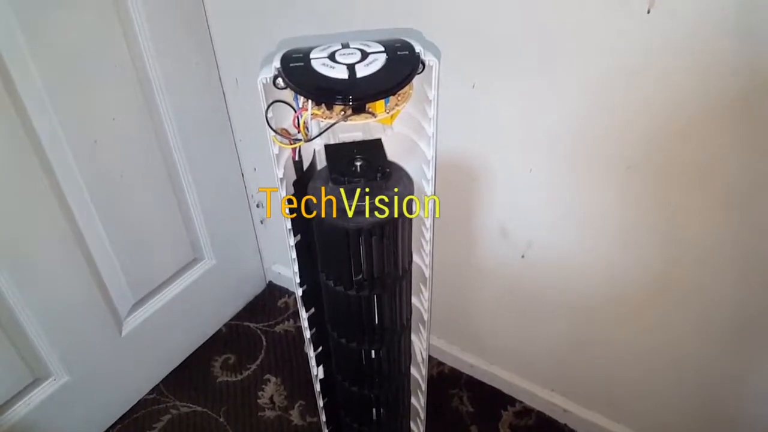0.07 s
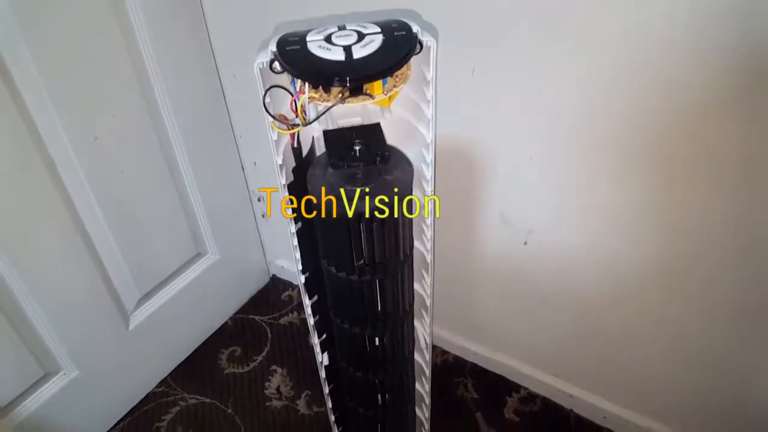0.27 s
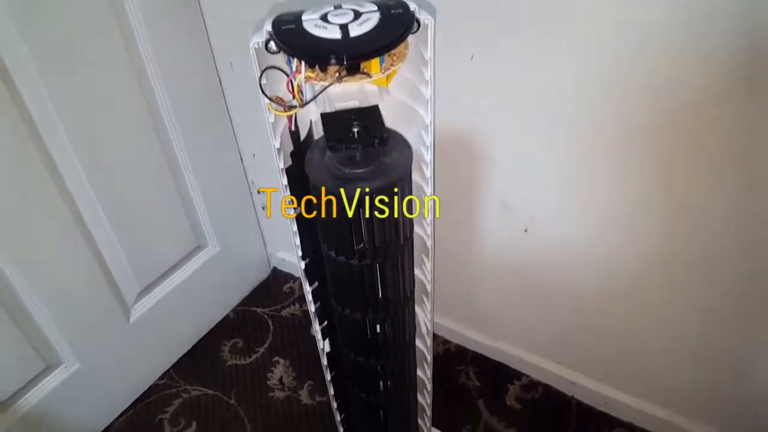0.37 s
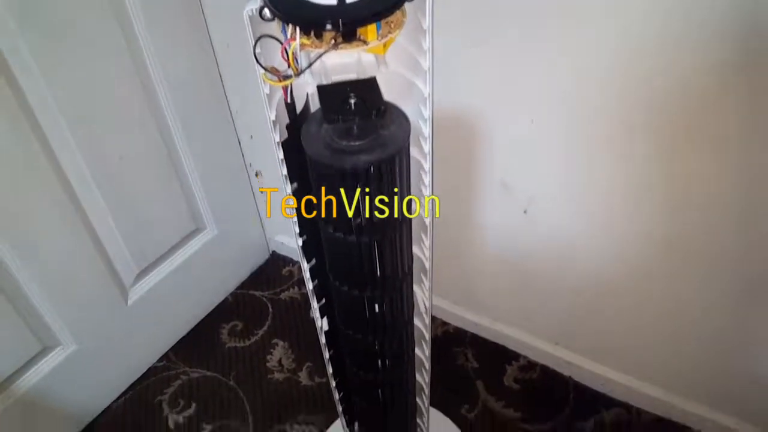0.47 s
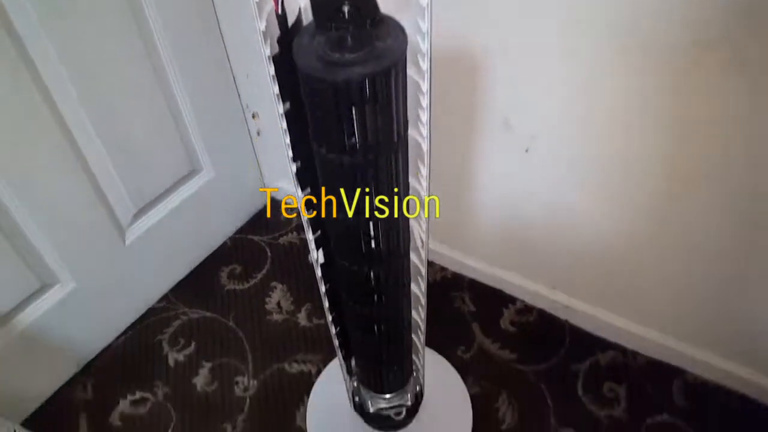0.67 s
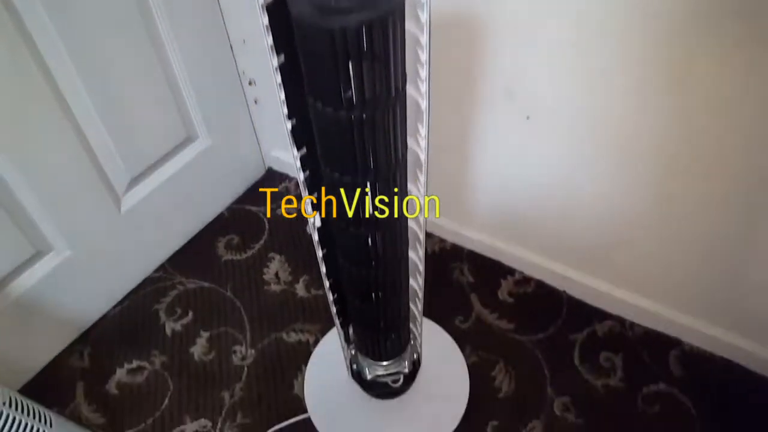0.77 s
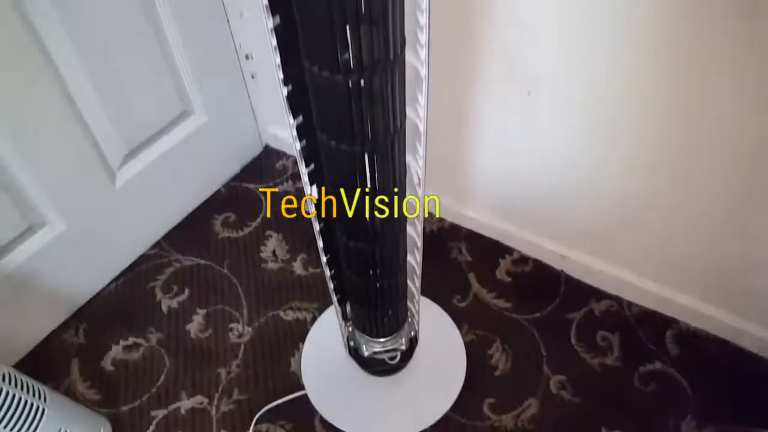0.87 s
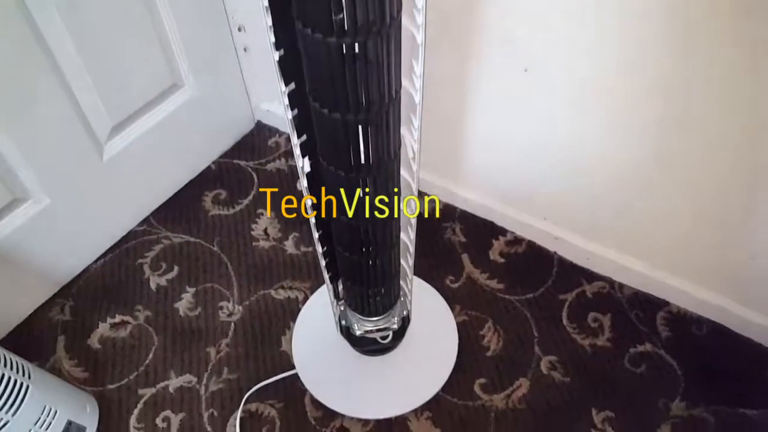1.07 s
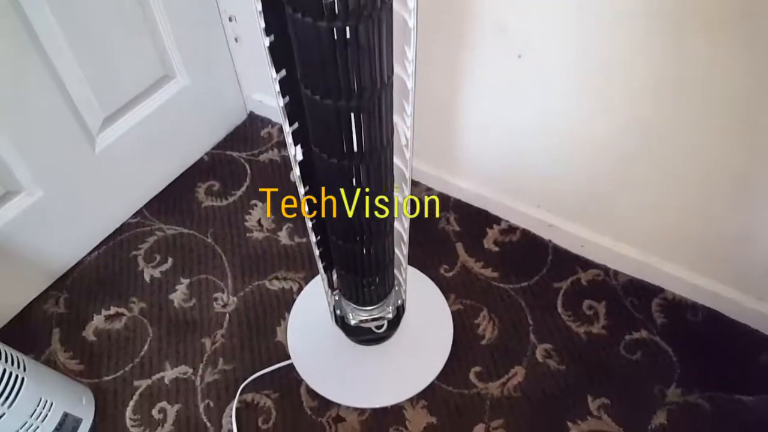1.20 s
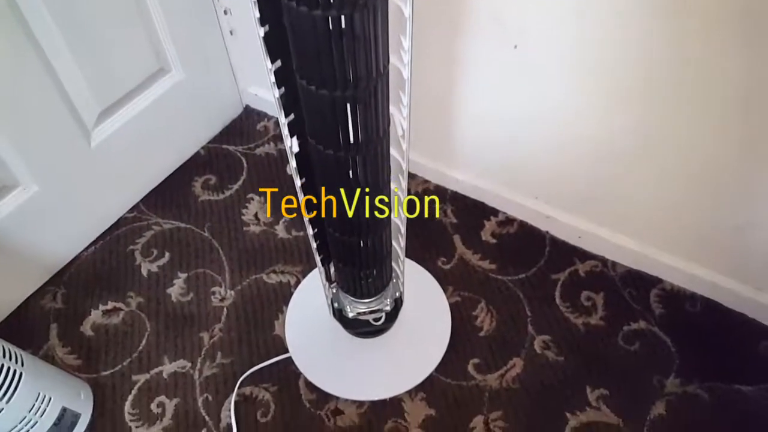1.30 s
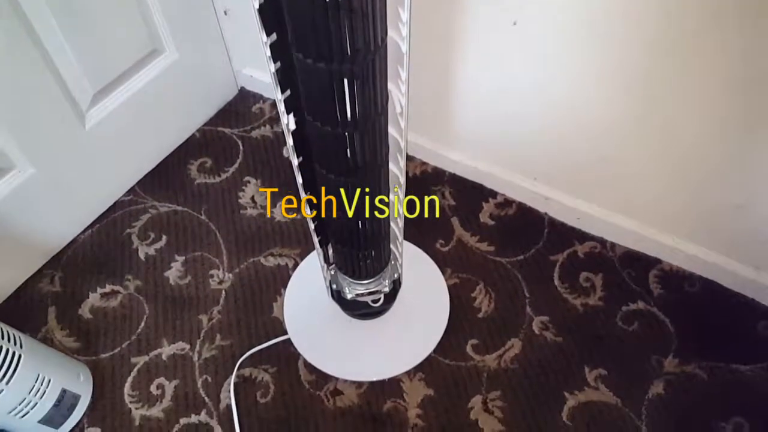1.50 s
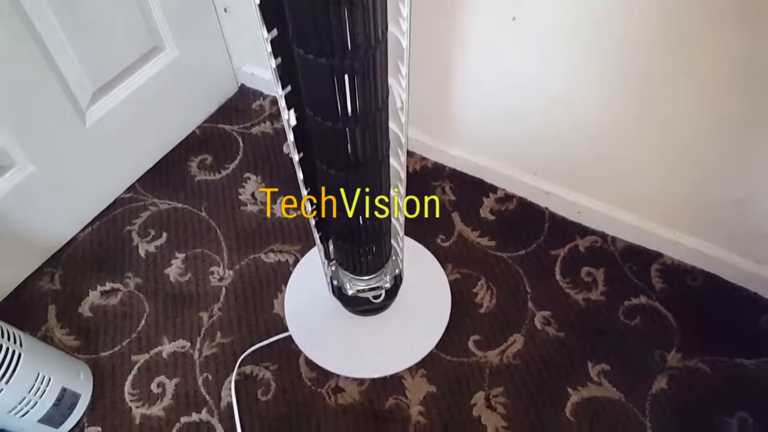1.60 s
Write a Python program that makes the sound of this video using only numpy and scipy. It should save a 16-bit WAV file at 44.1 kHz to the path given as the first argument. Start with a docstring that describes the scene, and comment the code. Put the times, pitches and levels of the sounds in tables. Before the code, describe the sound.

A sharp handling click sounds right against a hand-held microphone, on the right side. Tiny ticks and rubs follow, and about a second later comes a softer knock on the plastic case, in a quiet room with a faint hum.

```python
"""A quiet room, beside an opened tower fan that stands still; a hand-held stereo camera moves over it.
Close to the right microphone, fingers knock and rub on the camera: one sharp click, small ticks, later
a weaker knock that rings the plastic shell. The touches thud, ring the case low and are coloured by the
microphone port. Behind them lie room noise, a low hum, a thin whine, a few faint whistles (some falling)
and one brush of cloth."""
import sys
import numpy as np
from scipy import signal
from scipy.io import wavfile
from scipy.ndimage import uniform_filter1d

SR = 44100
rng = np.random.default_rng(int(sys.argv[2]) if len(sys.argv) > 2 else 0)


def output_pcm(signal):
    """Save a mono or channel-first signal as 16-bit PCM at the path in sys.argv[1].

    Samples are clipped to [-1, 1] before scaling.
    """
    pcm = np.clip(np.atleast_2d(signal).T, -1, 1) * 32767
    wavfile.write(sys.argv[1], SR, np.round(pcm).astype(np.int16))


N = 72765


def amp(db):
    """dB to gain."""
    return 10 ** (np.asarray(db) / 20)


def unit_rms(x):
    """Scales to rms 1."""
    return x / np.sqrt(np.mean(x ** 2) + 1e-20)


def curve_at(points, hz):
    """Reads a table on a log-frequency axis."""
    f, value = np.transpose(points)
    return np.interp(np.log(hz + 1), np.log(f + 1), value)


def add(mix, start, sound):
    """Mixes a sound in at start seconds."""
    part = mix[:, round(start * SR):][:, :sound.shape[-1]]
    part += sound[..., :part.shape[1]]


def butter(x, hz, kind, order):
    """Low-pass or high-pass."""
    return signal.sosfilt(signal.butter(order, min(hz, SR / 2 - 100), kind, fs=SR, output="sos"), x)


def coloured(x, points):
    """Minimum-phase filter with the given spectrum."""
    log_gain = np.log(amp(curve_at(points, abs(np.fft.fftfreq(4096, 1 / SR)))))
    taps = np.fft.ifft(np.exp(np.conj(signal.hilbert(log_gain)))).real
    return signal.fftconvolve(x, taps[None], axes=1)[:, :N]


def close_right(sound, left_db):
    """Full level at the right microphone, a leak at the left."""
    return np.array([amp(left_db) * sound, sound])


# Hard finger contacts, close to the right microphone; levels before filtering:
# t/s, pulse level/dB, brightness f/Hz, low cut f/Hz, crack level/dB, left leak/dB, press +1 or release -1
CONTACTS = [(.1839, -38, 3400, 250, -64, -34, -1), (0.2446, -10, 4170, 1830, -40, -31, -1),
            (0.2447, -8, 1330, 161, -35, -40, 1), (0.2457, -14.5, 1600, 770, -39, -40, -1),
            (0.2487, -9.5, 1290, 70, -48, -56, -1), (0.3186, -43.5, 1500, 200, -58, -25, 1),
            (0.3892, -32, 1160, 273, -68, -29, -1), (0.4584, -42, 1010, 120, -72, -33, -1),
            (.4864, -43.5, 1110, 120, -79, -33, -1), (1.3376, -35.5, 7500, 1500, -58, -24, -1),
            (1.3378, -27.5, 3770, 900, -42, -14, 1), (1.347, -42.5, 890, 100, -60, -30, 1),
            (1.5439, -48.5, 603, 80, -80, -14, -1), (1.577, -49, 9000, 3000, -60, -24, -1),
            (1.6100, -41, 4000, 600, -59, -20, -1)]
def finger_clicks():
    """Each hard contact on the camera is one short pressure pulse with a crack of noise."""
    out, t = np.zeros((2, N)), np.arange(SR // 20) / SR
    crack_decay_s, crack_top_hz = 0.00098, 9000
    for start, pulse_db, bright_hz, low_hz, crack_db, left_db, polarity in CONTACTS:
        u = 2 * np.pi * bright_hz * t
        pulse = polarity * amp(pulse_db) * (u / 2) ** 2 * np.exp(2 - u)
        pulse = butter(pulse, low_hz, "high", order=1)
        hiss = butter(rng.standard_normal(len(t)), crack_top_hz, "low", order=1)
        hiss = unit_rms(butter(hiss, bright_hz, "high", order=2))
        crack = amp(crack_db) * hiss * np.exp(-t / crack_decay_s)
        add(out, start, close_right(pulse + crack, left_db))
    return out


# Soft fingertip pushes at the right microphone, ahead of its port:
# t/s, level/dB, f/Hz, t60/s, left leak/dB, press +1 or release -1
PUSHES = [(0.2471, -15.5, 160, 0.022, -24.5, -1), (0.3215, -44, 135, 0.055, -36, -1),
          (0.459, -53, 113, .02, -22, 1), (1.3392, -36.5, 163, 0.012, -28, -1),
          (1.3461, -36, 174, 0.029, -33, 1), (1.6100, -42, 187, 0.02, -25, 1)]
def fingertip_thuds():
    """The fingertip pushes the air at the port: a heavily damped low swing."""
    out, t = np.zeros((2, N)), np.arange(SR // 10) / SR
    attack = 1 - np.exp(-t / 0.00049)
    for start, db, hz, t60, left_db, polarity in PUSHES:
        swing = polarity * np.sin(2 * np.pi * hz * t) * np.exp(-np.log(1000) * t / t60)
        add(out, start, close_right(amp(db) * swing * attack, left_db))
    return out


# Finger slides beside the right microphone, ahead of its port: peak t/s, rise/s, fall/s, level/dB
SLIDES = [(.178, 0.017, 0.011, -62.5), (.2520, 0.0057, 0.0049, -34), (.275, 0.018, 0.028, -61),
          (.3225, .005, .011, -49), (0.373, 0.036, 0.018, -65.5), (0.524, 0.023, 0.014, -62.5),
          (1.356, 0.014, 0.02, -60.5), (1.614, 0.0082, 0.012, -58.5), (1.641, 0.016, .025, -58)]
# Friction spectrum: f/Hz, relative level/dB
FRICTION_SPECTRUM = [(40, -7), (150, -0.5), (450, 1.5), (1100, -1), (2200, -4), (4000, -9.5), (8000, -20.5),
                     (15000, -27)]
def skin_rubs(grain_db=3):
    """Skin slides on the case: grainy friction that swells and dies with each slide."""
    t = np.arange(N) / SR
    hiss = rng.standard_normal(N)
    roughness = unit_rms(uniform_filter1d(rng.standard_normal(N), size=12))
    grains = hiss * amp(grain_db * roughness)
    friction = unit_rms(coloured(grains[None], FRICTION_SPECTRUM)[0])
    swells = sum(amp(db) * np.exp(-((t - peak) / np.where(t < peak, rise, fall)) ** 2)
                 for peak, rise, fall, db in SLIDES)
    return close_right(swells * friction, left_db=-30.5)


def case_ring(touches, hz=88, t60=0.081, gain_db=-1.5):
    """One low resonance of the case, rung by every touch."""
    radius = np.exp(-np.log(1000) / (t60 * SR))
    pole = radius * np.exp(2j * np.pi * hz / SR)
    return amp(gain_db) * 2 * signal.lfilter([1 - radius], [1, -pole], touches).real


# Shell modes, reaching both microphones, ahead of the ports: f/Hz, level/dB, t60/s
SHELL_MODES = [(1670, -55, 0.012), (2460, -47.5, 0.0053), (6850, -51, 0.0034)]
def shell_ring(knock_s=1.338):
    """The later knock briefly rings the camera's plastic shell."""
    out, t = np.zeros((2, N)), np.arange(SR // 20) / SR
    for hz, db, t60 in SHELL_MODES:
        mode = amp(db) * np.exp(-np.log(1000) * t / t60) * np.sin(2 * np.pi * hz * t)
        add(out, knock_s, close_right(mode, left_db=-2.5))
    return out


# Room tone, all around the camera: f/Hz, relative level per Hz/dB
ROOM_SPECTRUM = [(20, -27), (45, -3), (100, -6.5), (200, -5.5), (450, -9.5), (900, -13.5), (1300, -14.5),
                 (1800, -16.5), (2700, -18), (5500, -23.5), (7200, -21.5), (10000, -29), (13000, -24.5),
                 (15000, -27)]
# Likeness of the room tone at the two microphones: f/Hz, correlation
ROOM_COHERENCE = [(30, 0.47), (130, 0.49), (600, 0.059), (3000, 0.0067), (15000, 0.0088)]
def room_tone(level_db=-68, patch_db=1.96):
    """Quiet room noise with slight drifting patches; the microphones are most alike in the bass."""
    frames, hz = N // 256 + 5, np.fft.rfftfreq(1024, 1 / SR)
    left_re, left_im, apart_re, apart_im, patches = rng.standard_normal((5, frames, len(hz)))
    patches = uniform_filter1d(patches, size=12, axis=0)  # smooth in time
    patches = unit_rms(uniform_filter1d(patches, size=16, axis=1))  # and in frequency
    coherence = curve_at(ROOM_COHERENCE, hz)
    left = left_re + 1j * left_im
    right = coherence * left + np.sqrt(1 - coherence ** 2) * (apart_re + 1j * apart_im)
    spectra = np.array([left, right]) * amp(curve_at(ROOM_SPECTRUM, hz) + patch_db * patches)
    noise = signal.istft(spectra.transpose(0, 2, 1), nperseg=1024, noverlap=768)[1][:, :N]
    return amp(level_db) * unit_rms(noise)


# Hum and whine in the background, at both microphones: f/Hz, rms level/dB
STEADY_TONES = [(49.6, -79.5), (99.2, -79.5), (148.5, -95), (1362, -84.5), (2725, -94)]
def hum_and_whine(waver_depth=0.3, waver_hz=7.2):
    """Steady tones, wavering a little in level and phase at each microphone."""
    out, t = np.zeros((2, N)), np.arange(N) / SR
    for hz, db in STEADY_TONES:
        waver = waver_depth * unit_rms(butter(rng.standard_normal((2, N)), waver_hz, "low", order=2))
        phase = 2 * np.pi * (hz * t + rng.random()) + waver[::-1]
        out += amp(db) * np.sqrt(2) * (1 + waver) * np.sin(phase)
    return out


# Background whistles, centred between the microphones: t/s, length/s, level/dB, first f/Hz, last f/Hz
WHISTLE_GLIDES = [(.61, 0.053, -76, 1205, 1100), (.74, .1, -69, 1366, 1382),
                  (0.818, 0.071, -72.5, 1350, 1158), (1.16, .08, -78.5, 1276, 1184),
                  (1.26, .09, -70.5, 1366, 1382)]
def faint_whistles():
    """Pure tones that swell and fade, nearly holding their pitch or sliding down."""
    out = np.zeros((2, N))
    for start, length, db, first_hz, last_hz in WHISTLE_GLIDES:
        progress = np.linspace(0, 1, round(length * SR))
        cycles = np.cumsum(first_hz + (last_hz - first_hz) * progress) / SR
        add(out, start, amp(db) * np.sin(np.pi * progress) * np.sin(2 * np.pi * cycles))
    return out


def cloth_rustle(peak_s=1.245, width_s=0.03, level_db=-73, low_hz=1700, top_hz=3800):
    """A faint brush of cloth: one swell of hiss at both microphones."""
    t = np.arange(N) / SR
    hiss = butter(rng.standard_normal((2, N)), low_hz, "high", order=3)
    hiss = unit_rms(butter(hiss, top_hz, "low", order=3))
    return amp(level_db) * hiss * np.exp(-((t - peak_s) / width_s) ** 2)


# Colour that the microphone port gives to touches on the camera: f/Hz, gain/dB
PORT_RESPONSE = [(20, -11), (50, -3.5), (150, 0), (1000, -1), (2100, 0), (3200, -3), (4400, -1), (7500, 4),
                 (10000, -4), (12500, 5), (15000, 7)]
def scene():
    """Close touches pass the microphone port; the room lies behind them."""
    touches = finger_clicks() + fingertip_thuds() + skin_rubs() + shell_ring()
    handling = coloured(touches + case_ring(touches), PORT_RESPONSE)
    return handling + room_tone() + hum_and_whine() + faint_whistles() + cloth_rustle()


def record(dry):
    """The camera's band limit: a steep low-pass at 14950 Hz."""
    taps = signal.firwin(301, 14950, window=("kaiser", 8), fs=SR)
    return signal.oaconvolve(dry, taps[None], "same", axes=1)


dry = scene()
out = record(dry)
output_pcm(out)
```